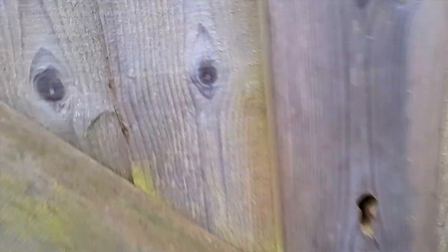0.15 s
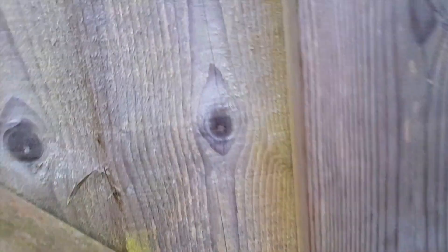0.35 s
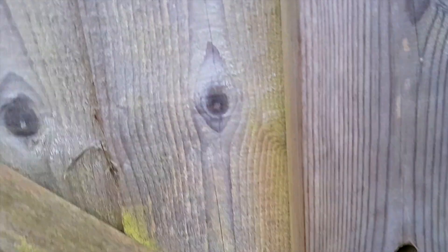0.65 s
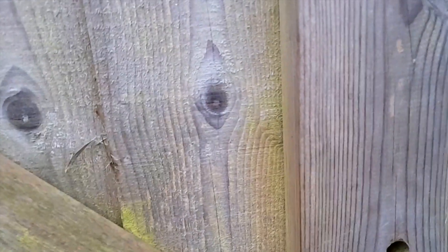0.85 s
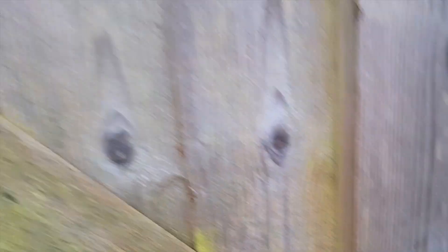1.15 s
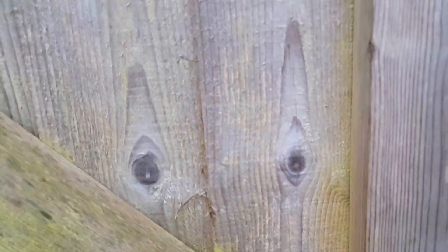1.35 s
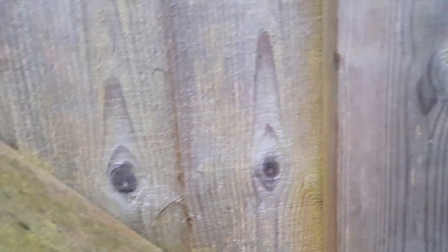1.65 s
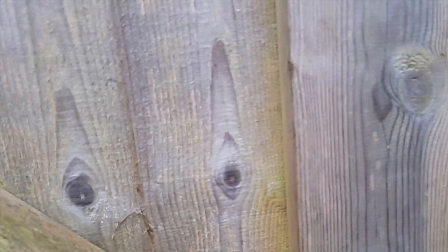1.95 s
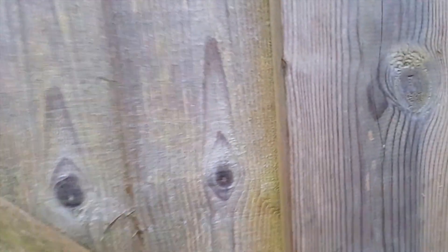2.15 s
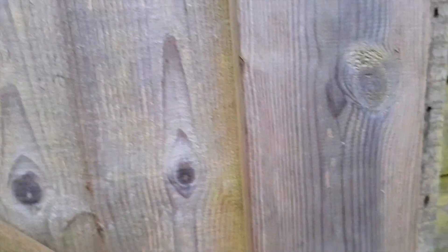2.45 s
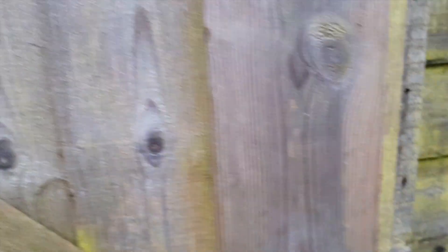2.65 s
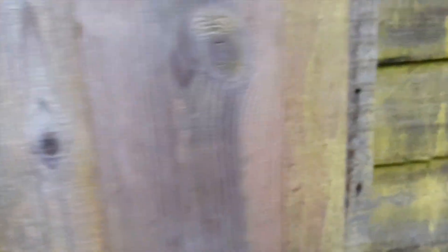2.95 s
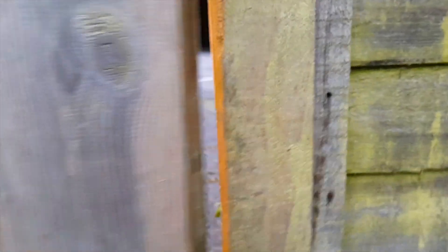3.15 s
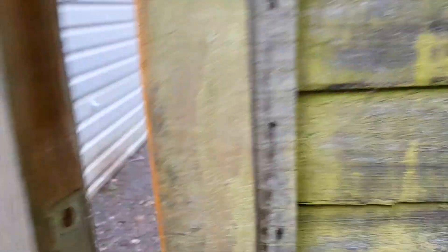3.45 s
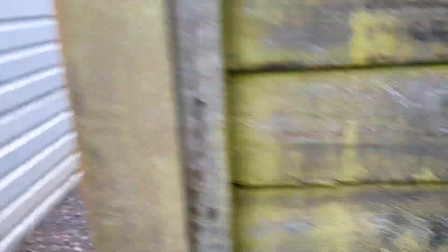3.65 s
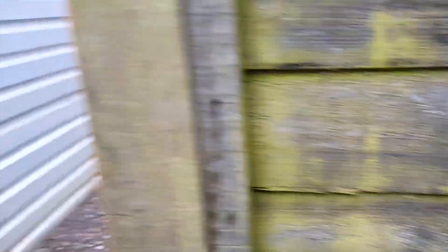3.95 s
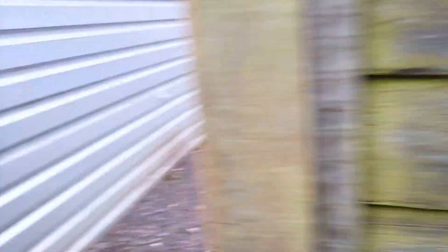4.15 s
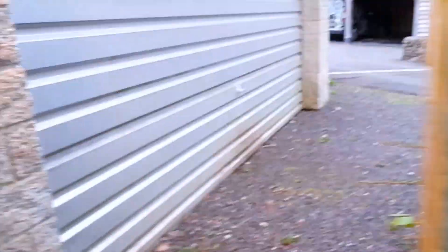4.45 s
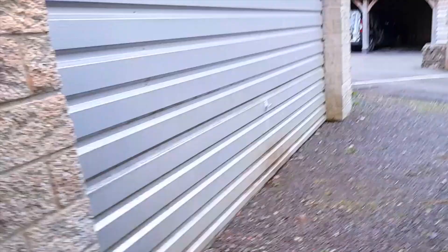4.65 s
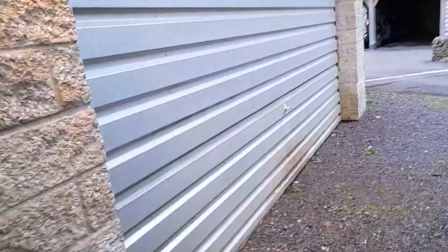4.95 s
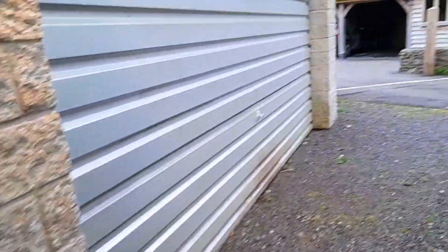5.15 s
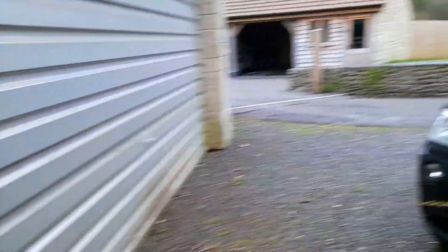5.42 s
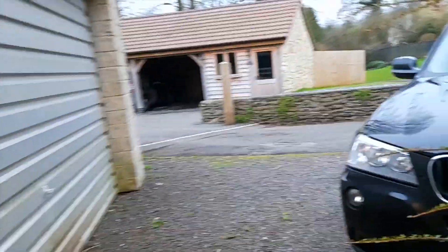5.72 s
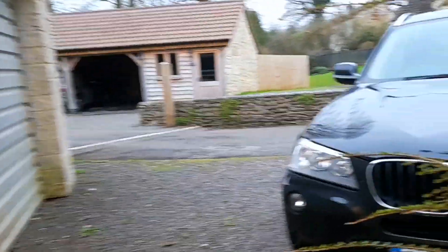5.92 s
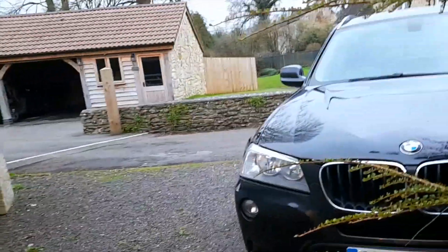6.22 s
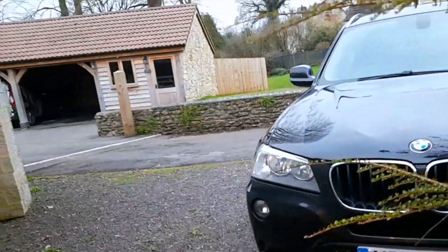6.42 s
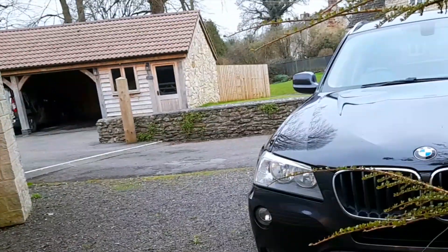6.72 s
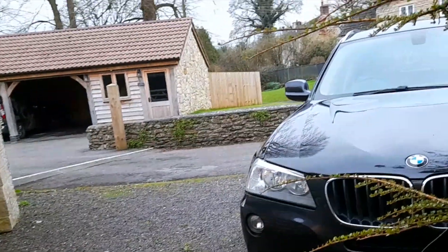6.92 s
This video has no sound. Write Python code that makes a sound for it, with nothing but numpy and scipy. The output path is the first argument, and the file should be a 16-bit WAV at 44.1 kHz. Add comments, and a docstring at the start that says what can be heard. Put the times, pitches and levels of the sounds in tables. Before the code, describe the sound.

A wooden garden gate is shoved, knocked and unlatched with steel clacks, scrapes open, then steps scuff on gravel while birds trill and warble.

```python
"""Low outdoor rumble and a scraping shove come first, then a wooden garden gate close by is knocked and unbolted.
Boards ring as dying bands of noise and tones, steel bolt and latch as sine modes, scrapes as grainy noise.
The gate scrapes, rasps and clacks, then steps scuff on to a gravel drive, made of noise and small ticks.
Birds are fluttering tones: whistles, hoarse chirps, a far pigeon, a repeated rising note, a loud warble.
Far traffic is noise that swells, sinks and ends clearest; walls, hedges and trees answer with diffuse echoes."""
import sys
import numpy as np
from scipy import signal
from scipy.fft import rfft, irfft, next_fast_len
from scipy.io import wavfile
from scipy.ndimage import uniform_filter1d, map_coordinates

SR = 44100
rng = np.random.default_rng(int(sys.argv[2]) if len(sys.argv) > 2 else 0)


def to_wav(s):
    """Save 16-bit WAV."""
    ch = np.atleast_2d(s).T  # columns
    pcm = np.round(np.clip(ch, -1, 1) * 32767)  # PCM
    wavfile.write(sys.argv[1], SR, pcm.astype(np.int16))


N = 312221  # length in samples

# Levels in the tables are relative: gains further on shift them.
# A left_right_db above zero means that the left is louder.


def amp(db):
    """Turn decibels into a gain."""
    return 10 ** (np.asarray(db) / 20)


def unit(x):
    """Scale a sound to an rms of 1."""
    return x / np.sqrt(np.mean(x ** 2) + 1e-20)


def along(points, hz):
    """Read a curve of (Hz, value) points on a log pitch axis."""
    point_hz, value = np.transpose(points)
    return np.interp(np.log(hz + 1), np.log(point_hz + 1), value)


def curves(rows):
    """Draw each column after the time as a curve with one value per sample."""
    s, *columns = np.transpose(rows)
    return [np.interp(np.arange(N) / SR, s, column) for column in columns]


def wobble(rate, size=N):
    """Draw a smooth random curve through `rate` random knots a second."""
    knots = rng.standard_normal(int(size * rate / SR) + 4)
    return map_coordinates(knots, [np.arange(size) * rate / SR])


def filtered(x, response):
    """Shape the spectrum of x by a gain that depends on frequency."""
    n = x.shape[-1]
    padded = next_fast_len(n + 4096)
    return irfft(rfft(x, padded) * response(np.fft.rfftfreq(padded, 1 / SR)), padded)[..., :n]


def pan(db):
    """Left and right gains for a level difference."""
    return amp([[db / 2], [-db / 2]])


def add(track, s, sound):
    """Mix a sound into the track at a time in seconds."""
    part = track[..., max(round(s * SR), 0):][..., :sound.shape[-1]]
    part += sound[..., :part.shape[-1]]


def fade(t, t60):
    """Free decay of a vibration: 60 dB down after t60 seconds."""
    return np.exp(-np.log(1000) * t / t60)


# how alike left and right are: pitch_hz, likeness (1 is identical)
ALIKE = [(60, 0.62), (200, 0.79), (400, 0.67), (700, -0.05), (1400, 0.03), (4000, -0.041)]


def pair(size):
    """White stereo noise, mostly shared in the bass and nearly unrelated in the treble."""
    turn = lambda hz: np.arccos(np.clip(along(ALIKE, hz), -1, 1)) / 2
    mid_side = lambda hz: np.array([np.cos(turn(hz)), np.sin(turn(hz))])
    mid, side = filtered(rng.standard_normal((2, size)), mid_side)
    return np.array([mid + side, mid - side])


def rush(spectrum):
    """Coloured stereo noise with an rms of 1."""
    return unit(filtered(pair(N), lambda hz: amp(along(spectrum, hz))))


def echo(x, decay, build_s):
    """A diffuse tail of noise that gathers, then dies at its own speed at each frequency."""
    hz, t, grid = signal.stft(rng.standard_normal((2, SR)), SR, nperseg=256)
    dying = grid * amp(-60 * t / along(decay, hz)[:, None])
    tail = signal.istft(dying, SR, nperseg=256)[1]
    tail *= np.clip(np.arange(tail.shape[1]) / SR / build_s, 0, 1)
    return signal.fftconvolve(x, tail / np.linalg.norm(tail[0]), axes=1)[:, :N]


# quick answer of hedges and roofs: pitch_hz, t60_s
HEDGES = [(500, .3), (3000, .17), (8000, .15)]
# long answer of the trees: pitch_hz, t60_s
TREES = [(500, 0.4), (3000, 0.65), (8000, 0.53)]
HEDGES_BUILD_S, TREES_BUILD_S = .008, 0.058  # time over which each echo gathers
TREES_DB = -6  # relative to the hedges


def garden(x):
    """Hedges and roofs blur a bird's call at once; the trees hold it faintly for longer."""
    hedges = echo(x[None], HEDGES, HEDGES_BUILD_S)
    return hedges + amp(TREES_DB) * echo(x[None], TREES, TREES_BUILD_S)


def whistle(hz, rough, flicker_db=3):
    """A nearly pure tone whose pitch and strength flutter."""
    hz = hz * (1 + rough * wobble(498.2, size=len(hz)))
    tone = np.sqrt(2) * np.sin(2 * np.pi * np.cumsum(hz) / SR)
    return tone * amp(flicker_db * wobble(110, size=len(hz)))


def patchy(x, depth_db):
    """Moving air lets different pitches of a far sound swell and sink."""
    grid = signal.stft(x, nperseg=2048)[2]
    field = rng.standard_normal(grid.shape[1:])
    field = uniform_filter1d(field, size=4, axis=0)  # smooth over pitch
    field = uniform_filter1d(field, size=9, axis=1)  # smooth over time
    return unit(signal.istft(grid * amp(depth_db * unit(field)), nperseg=2048)[1][:, :N])


# outdoor background, screened until the gate is passed: time_s, rumble_db, traffic_db
AIR = [(0, -45.5, -74.5), (1.4, -57.5, -60.5), (2.1, -55, -72), (4.1, -58.5, -64), (4.9, -57, -58.5),
       (7.08, -56.5, -56.5)]
# colour of the low rumble: pitch_hz, level_db per Hz
RUMBLE = [(20, -25.5), (40, 0), (62, -0.5), (90, -1.5), (160, -5), (250, -9.5), (400, -18), (600, -35),
          (1500, -59.5)]
# colour of the far traffic: pitch_hz, level_db per Hz
TRAFFIC = [(120, -33), (280, -6.5), (400, -7), (520, 1), (700, -3), (950, -3.5), (1180, -13.5), (1380, -7),
           (1900, -22.5), (2230, -15), (2900, -32), (5000, -53.5)]
# colour of the faint hiss: pitch_hz, level_db per Hz
HISS = [(1500, 1), (3000, -3.5), (6000, -3.5), (8400, -13.5), (9800, -0.5), (11500, -7), (14000, -2.5),
        (16000, -15)]


def outdoors():
    """Unsteady low rumble, patchy far traffic and a faint even hiss, all coloured noise."""
    rumble_db, traffic_db = curves(AIR)
    rumble = amp(rumble_db - 3.5 + 1.1 * wobble(9.6)) * rush(RUMBLE)
    traffic = amp(traffic_db + 0.7) * patchy(rush(TRAFFIC), depth_db=1.8)
    hiss = amp(-69.5) * rush(HISS)
    return rumble * pan(2.0) + traffic * pan(-0.57) + hiss * pan(1.2)


def swell(s, hold, attack, release):
    """An effort that builds up, holds and dies away."""
    t = np.arange(N) / SR - s
    return fade(np.maximum(-t, 0), attack) * fade(np.maximum(t - hold, 0), release)


def effort(rows, attack, release):
    """Strength of the rubbing and of the low shudder over a series of pushes or steps."""
    scrape, shudder = np.zeros(N), np.zeros(N)
    for s, hold, scrape_db, shudder_db in rows:
        shape = swell(s, hold, attack, release)
        scrape = np.maximum(scrape, amp(scrape_db) * shape)
        shudder = np.maximum(shudder, amp(shudder_db) * shape)
    return scrape, shudder


# resonances of boards and frame: pitch_hz, width_hz, level_db
FRAME = [(261, 11, 8), (360.5, 32, -9), (626.7, 5.9, 5), (1037, 110, 4), (1163, 17, 0.5), (1450, 52, 5),
         (1617, 49, 7.5), (2104, 130, 3.5), (2305, 290, 6.5)]


def frame_db(hz):
    """Lift given by the resonances of boards and frame."""
    return sum(db / (1 + (2 * (hz - centre) / width) ** 2) for centre, width, db in FRAME)


# the hand pushes the gate: full_force_s, hold_s, scrape_db, shudder_db
PUSHES = [(0, 0.0036, -56.5, -40), (.13, 0.091, -58.5, -48), (.35, 0.29, -58.5, -35.5),
          (1.31, 0.16, -61, -59.5), (2.45, 0.052, -66.5, -45), (2.8, 0.11, -68.5, -53),
          (2.97, .1, -59, -54), (3.138, .022, -42, -37.5), (3.25, 0.11, -51.5, -44.5),
          (3.405, 0.013, -52.5, -45.5), (3.56, 0.011, -46, -40)]
PUSH_ATTACK_S, PUSH_RELEASE_S = 0.45, 0.51  # each over 60 dB
# colour of wood rubbing on wood: pitch_hz, level_db per Hz
RUB = [(180, -38.5), (300, -3), (740, -5.5), (930, -12.5), (1140, -9), (2250, -9.5), (2900, -14.5),
       (5000, -12), (8500, -27.5), (10500, -19.5), (14000, -30.5), (16000, -39)]
# colour of the hollow gate's shudder: pitch_hz, level_db per Hz
HOLLOW = [(20, -13), (35, -7.5), (65, -4), (110, -0.5), (165, 0), (225, 2), (290, 0), (370, -11.5),
          (460, -9), (600, -8.5), (700, -31), (950, -16), (1500, -51.5)]


def rubbing(force, shaking, grain_db=3, judder_db=3):
    """Rough surfaces catch and slip in tiny grains, while the hollow gate shudders."""
    surge_db = 1.8 * wobble(70)
    grain = amp(grain_db * wobble(700) + surge_db)
    wood = filtered(rush(RUB), lambda hz: amp(0.39 * frame_db(hz)))
    scrape = amp(2.5) * force * unit(wood * grain)
    shudder = shaking * unit(rush(HOLLOW) * amp(judder_db * wobble(45)))
    return scrape * pan(1.2) + shudder * pan(1.5)


def grit(force, rate=110, scatter_db=-2.0):
    """Splinters and loose stones give way one by one, as loud as the rubbing is hard."""
    scatter = amp(scatter_db * np.clip(rng.standard_normal(N), -2, 2))
    slips = (rng.random(N) < rate / SR) * force * scatter  # on average `rate` a second
    t = np.arange(SR // 50) / SR
    tick = unit(filtered(pair(len(t)), lambda hz: amp(along(RUB, hz)))) * fade(t, 0.0084)
    return amp(-8) * signal.fftconvolve(slips[None], tick, axes=1)[:, :N]


# thin falling calls: start_s, length_s, first_pitch_hz, fall in octaves per s, level_db
SLURS = [(0.667, 0.12, 4750, 3.3, -71), (0.861, 0.086, 6680, 3.1, -57), (1.039, 0.075, 6530, 3.7, -55),
         (1.193, 0.047, 5350, 2.7, -50), (2.711, .048, 6910, 3.2, -68.5), (2.881, 0.087, 7100, 4, -61.5),
         (4.477, 0.042, 7780, 3.4, -47), (4.593, 0.032, 7630, 3.6, -45.5), (4.712, 0.054, 7830, 3.5, -47.5),
         (5.196, 0.11, 6850, 3.1, -46.5), (5.39, 0.071, 6700, 3.5, -48.5),
         (5.444, 0.046, 6050, 3.65, -44.5), (5.484, 0.03, 5700, 14, -41.5), (5.528, 0.021, 6000, 9, -52),
         (5.672, 0.079, 6400, 3.7, -59), (5.89, .05, 6300, 6.2, -60), (6.925, 0.062, 7050, 3.2, -65)]
# held whistles: start_s, length_s, pitch_hz, level_db, flutter (scaled below), share by which it starts flat
WHISTLES = [(0.023, 0.26, 7550, -63.5, 1, 0.02), (0.627, 0.054, 4850, -53, 0.86, 0.057),
            (0.933, 0.4, 4520, -65, 0.72, 0.015), (2.9, 0.096, 4710, -45.5, 0.32, 0.08),
            (4.007, 0.15, 5590, -44, 0.19, 0.05), (4.505, 0.038, 2500, -51, 0.5, .04),
            (4.954, 0.059, 5000, -51, 1.7, 0.067), (5.409, 0.032, 5350, -38, 0.8, 0.1),
            (5.416, 0.056, 4450, -47, 0.77, .03), (5.42, 0.05, 3130, -54, 0.7, .13),
            (6.16, 0.066, 4370, -48, 0.15, 0.26), (6.51, 0.18, 4705, -61, 0.15, 0),
            (6.536, 0.13, 2250, -71.5, 0, 0.029)]
SCOOP_S, SCOOP_DB = .028, -13  # time of the slide up to pitch; level at its foot
SAG_PER_S = 0.17  # share of its pitch by which a held whistle sinks each second


def twitter(flutter_depth=0.045, slur_rough=0.0092):
    """Falling calls and held whistles from the trees, each a fluttering tone."""
    out = np.zeros(N)
    note = lambda hz, db, rough: amp(db) * whistle(hz, rough) * signal.windows.tukey(len(hz), .3)
    for s, length, hz, fall, db in SLURS:
        t = np.arange(int(length * SR)) / SR
        add(out, s, note(hz * 2 ** (-fall * t), db, slur_rough))
    for s, length, hz, db, flutter, scoop in WHISTLES:
        t = np.arange(int(length * SR)) / SR
        below = np.maximum(1 - (t / SCOOP_S) ** 2, 0)
        pitch = hz * (1 - scoop * below - SAG_PER_S * t)
        add(out, s, note(pitch, db + SCOOP_DB * below, flutter * flutter_depth))
    return amp(-9.5) * out * pan(3.5) + amp(-7) * garden(out)


# blows on the gate: start_s, thud_db, clack_db, clack_pitch_hz, rebounds (rounded), left_right_db
BLOWS = [(.121, -46, -50, 3560, 0, -7.5), (0.25, -47, -55.5, 1380, 0, -1), (0.322, -79, -46.5, 2398, 0, -3),
         (.391, -26, -33.5, 1498, 0, -9.5), (.395, -30, -15.5, 2600, 0, -1.5),
         (0.499, -44, -39.5, 1840, 0, -4), (.536, -45, -40.5, 1860, 1, -9),
         (0.552, -26.5, -30, 1920, 0.5, -3), (.78, -22.5, -17, 7040, 0, -2.5),
         (0.786, -35, -32, 2340, 0, 4), (.8, -30.5, -25, 2940, 1, -4), (.911, -38, -46, 1398, 0, -5.5),
         (1.172, -26, -23.5, 1135, 0, 1.5), (1.181, -19.5, -25.5, 1390, 0, -4.5),
         (2.41, -34.5, -43, 1336, 0, -0.5), (2.485, -46, -31, 11180, 0, -2.5),
         (2.519, -36.5, -37.5, 2010, 0, -4), (2.736, -56.5, -44.5, 1730, 0, -1.5),
         (2.954, -57, -49, 2220, 0, -8), (2.986, -78, -45, 2300, 0, -5), (3.11, -43, -38, 1310, 0, -7),
         (3.178, -35.5, -30, 3400, 0, 1), (3.242, -41, -48.5, 1100, 0, 0.5),
         (3.268, -48, -34.5, 1720, 0, 0), (3.305, -51, -36.5, 3020, 0, 4),
         (3.312, -42.5, -35.5, 2260, 0, -3.5), (3.375, -60, -51.5, 1620, 0, -3),
         (3.501, -59, -26.5, 4250, 0, 5), (3.504, -57, -28, 4240, 0, 1.5), (3.508, -46, -27, 2010, 0, -2.5),
         (3.586, -48, -35.5, 1455, 0, -4), (4.186, -71, -38, 2066, 0, -8),
         (4.197, -47.5, -40, 5850, 0, 5.5), (4.589, -39.5, -42.5, 1490, 1, 5.5),
         (4.606, -25.5, -25, 6000, 0, 0), (4.611, -28.5, -26.5, 1270, 1, -5.5),
         (4.707, -29.5, -37, 3480, 0, -1), (4.924, -73, -59, 7000, 0, 2), (5.138, -87, -56.5, 12000, 0, 0)]
REBOUND_S = 0.0096  # flight time of a rebound
# losses and pitch ratio of each rebound
REBOUND_THUD_DB, REBOUND_CLACK_DB, REBOUND_PITCH_RATIO = 9, 10, 1


def contacts():
    """A hard blow rebounds, each time weaker."""
    return [(s + k * REBOUND_S, thud - k * REBOUND_THUD_DB, clack - k * REBOUND_CLACK_DB,
             hz * REBOUND_PITCH_RATIO ** k, side)
            for s, thud, clack, hz, rebounds, side in BLOWS for k in range(round(rebounds) + 1)]


# how long the boards sound: pitch_hz, t60_s
BOARDS_DIE = [(100, 0.23), (300, 0.14), (700, 0.072), (2000, 0.058), (5000, 0.027), (12000, 0.019)]


def ringing(level_db, t, right_lead_s=0.00031):
    """The frame's modes ring on, in a new balance at each blow, a little earlier on the right."""
    hz, _, db = np.transpose(FRAME)[:, :, None]
    luck_db = rng.normal(0, 2, hz.shape)
    phase = 2 * np.pi * rng.random(hz.shape)
    heard = t + np.array([0, right_lead_s])[:, None, None]
    strength = amp(level_db(hz) + db + luck_db) * fade(t, along(BOARDS_DIE, hz))
    modes = strength * np.sin(2 * np.pi * hz * heard + phase)
    return modes.sum(1) * (1 - np.exp(-t / .001))


# the boards' answer to a blow: pitch_hz, level_db
BOARDS = [(30, -7), (70, 6), (130, 8), (260, 13.5), (450, 18), (750, 13.5), (1200, 13.5), (1750, 8.5),
          (2300, 9.5), (3000, 5.5), (4500, 9), (7000, 7), (11000, 6.5), (16000, -5.5)]
CLACK_FALL_DB = 9.5  # lost per octave above the pitch of the clack


def knocks(count=8, ring_db=-24, snap_db=3, snap_t60=0.0074):
    """Each blow snaps, then sets off the dense modes of the boards; the high ones die first."""
    out, t = np.zeros((2, N)), np.arange(SR // 4) / SR
    centres = np.geomspace(100, 12800, count)
    # overlapping bands that together cover all pitches
    bands = lambda hz: np.array([along(np.c_[centres, one], hz) for one in np.eye(count)])[:, None]
    band_hz = centres[:, None, None]
    # the upper bands follow the snap of first contact best
    snap = amp(snap_db) * fade(t, snap_t60) * band_hz / (band_hz + 1500)
    rise = 1 - np.exp(-t / (.0004 + 1 / band_hz))
    dying = (fade(t, along(BOARDS_DIE, band_hz)) + snap) * rise
    body_db = lambda hz: along(BOARDS, hz) + frame_db(hz)
    for s, thud, clack, clack_hz, side in contacts():
        fall_db = lambda hz: CLACK_FALL_DB * np.log2(np.maximum(hz / clack_hz, 1))
        force_db = lambda hz: along([(300, thud), (clack_hz, clack)], hz) - fall_db(hz)
        parts = filtered(pair(len(t)), lambda hz: bands(hz) * amp(force_db(hz) + body_db(hz)))
        # the bass always leans left
        sides = np.array([pan(db) for db in along([(350, 3), (1200, side)], centres)])
        add(out, s, amp(1) * (parts * dying * sides).sum(0))
        ring_level_db = lambda hz: ring_db + force_db(hz) + along(BOARDS, hz)
        add(out, s, pan(side) * ringing(ring_level_db, t))
    return out


SHAKE_DB, SHAKE_T60 = -19, 0.56  # level relative to the blow's thud; decay in s


def aftershake():
    """Strength of the shudder that every blow leaves in the gate."""
    shaking, t = np.zeros(N), np.arange(SR) / SR
    for s, thud_db, *_ in BLOWS:
        add(shaking, s, amp(thud_db + SHAKE_DB) * fade(t, SHAKE_T60))
    return shaking


# the boards swing as the gate shifts in its frame, and later the steps thud: start_s, peak_db, pitch_hz
BUMPS = [(0.305, -27, 249), (.32, -27, 190), (0.383, -18.5, 227), (0.423, -21.5, 222), (0.565, -15.5, 231),
         (0.616, -27.5, 295), (0.644, -29, 200), (0.803, -15.5, 346), (1.184, -30, 223), (1.22, -30, 212),
         (3.11, -44.5, 1300), (3.128, -31, 293), (3.176, -34, 905), (3.188, -39, 510), (3.202, -31.5, 250),
         (3.243, -33.5, 340), (3.359, -38, 255), (3.514, -31, 260), (3.549, -29.5, 257), (3.59, -32.5, 513),
         (4.463, -38, 250), (4.723, -30, 287), (4.774, -33, 203), (7.043, -26.5, 76), (7.052, -29.5, 150)]


def bumps(peak_s=0.0028):
    """The whole gate swings briefly against its frame, or a step lands heavily: a tone that swells and dies at
    once."""
    out, t = np.zeros(N), np.arange(SR // 8) / SR
    for s, db, hz in BUMPS:
        shape = t / peak_s * np.exp(1 - t / peak_s)
        add(out, s, amp(db) * shape * np.sin(2 * np.pi * hz * t))
    return out * pan(1.6)


# steel on steel, damped by the hand that holds it:
# start_s, level_db, most_excited_hz, spread in octaves, share of free ring time, left_right_db
CLINKS = [(.396, -20, 12780, 0.029, 0.5, -6), (.398, -21, 2347, 0.23, 0.23, -15),
          (.781, -24.5, 9640, 1.1, 1, -1.5), (.801, -31.5, 7040, .08, 1, -6),
          (2.413, -62, 7000, 0.091, 0.51, -8), (2.484, -18, 10680, 0.016, 0.51, -8),
          (2.485, -21.5, 5730, 0.3, 0.58, -3), (2.49, -25, 12700, .03, 0.38, -7),
          (3.502, -8, 4300, 0.09, 0.2, -12), (4.606, -12, 9740, 0.036, 0.069, 17.5)]
# modes of bolt and latch when free: pitch_hz, level_db, t60_s
STEEL = [(2347, -6, .12), (4452, -11, .11), (4700, -8, .09), (5870, -6, .07), (7120, -5, .18),
         (8489, -11, .06), (9063, 0, .18), (9308, -10, .06), (9878, 2, .13), (10678, -1, .16),
         (12700, -6, .11), (14692, -9, .16)]


def clinks(chatter_db=3.5, right_phase=1.59):
    """The point of contact decides which of the steel's modes ring; the loose bar chatters as it rings."""
    out, t = np.zeros((2, N)), np.arange(SR // 3) / SR
    for s, db, best_hz, spread, free, side in CLINKS:
        for hz, level, t60 in STEEL:
            excited = 1 / (1 + (np.log2(hz / best_hz) / spread) ** 2)
            phase = rng.uniform(0, 2 * np.pi) + np.array([[0], [right_phase]])  # radians
            chatter = chatter_db * fade(t, .25) * wobble(250, size=len(t))
            strength = amp(db + level + chatter) * excited * fade(t, free * t60)
            ring = strength * np.sin(2 * np.pi * hz * t + phase)
            add(out, s, pan(side) * ring * (1 - np.exp(-t / 0.0013)))
    return out


# raspy chirps from a far hedge: start_s, length_s, pitch_hz, glide and arch as shares of pitch, level_db
CHIRPS = [(0.685, 0.12, 1770, -0.25, 0.25, -61), (1.297, 0.092, 1817, -0.042, 0.355, -63.5),
          (1.474, 0.094, 1814, 0, 0.86, -56), (2.515, 0.1, 1872, -0.21, 0.51, -58.5),
          (3.642, 0.076, 1990, 0, 0.4, -60), (5.723, 0.058, 1700, 0.054, 0.047, -51.5),
          (5.749, .1, 1765, -0.3, 0.12, -48.5), (5.814, 0.096, 1717, -0.27, 0.3, -51.5),
          (5.876, .05, 2030, -0.11, 0.37, -62), (5.975, 0.037, 2230, 0.51, .1, -56),
          (6.768, 0.11, 1735, -0.09, 0.83, -52.5), (6.978, 0.087, 1823, -0.011, 0.47, -50.5)]
# resonances of the bird's throat: pitch_hz, level_db
THROAT = [(1700, -19.5), (2300, -17), (2900, -2.5), (3500, 2), (4300, 4), (5100, -8), (6200, -19.5),
          (8000, -29)]
HOARSE, RATTLE = .02, .22  # pitch jitter; share of power that is noise round the harmonics


def chirps(count=4):
    """Hoarse harmonics, partly broken into noise, glide and arch through the throat's resonances."""
    out = np.zeros(N)
    for s, length, pitch_hz, glide, arch, db in CHIRPS:
        u = np.linspace(-.5, .5, int(max(length, .01) * SR))
        hoarse = HOARSE * wobble(900, size=len(u))
        base_hz = np.abs(pitch_hz * (1 + glide * u - arch * u ** 2 + hoarse))
        hz = np.arange(1, count + 1)[:, None] * base_hz
        phase = 2 * np.pi * (np.cumsum(hz, axis=1) / SR + rng.random((count, 1)))
        rattle = np.array([wobble(400 * (k + 1), size=len(u)) for k in range(count)])
        voice = np.sqrt(1 - RATTLE) * np.sin(phase) + np.sqrt(RATTLE) * rattle * np.cos(phase)
        flicker = amp(3 * wobble(150, size=len(u)))
        call = unit((amp(along(THROAT, hz)) * voice).sum(0) * flicker)
        add(out, s, amp(db) * call * np.cos(np.pi * u))
    return out * pan(1.5) + amp(-2.5) * garden(out)


# the far pigeon: start_s, pitch_hz, level_db
COOS = [(1.66, 591, -65.5), (2.3, 614, -70.5), (4.87, 590, -58.5), (5.24, 722, -58), (5.43, 585.5, -55.5),
        (6.38, 518, -63.5), (6.81, 538, -58.5)]


def pigeon(length=0.1456, fall=0.206):
    """Soft falling tones, followed by the long echo of the trees."""
    out, u = np.zeros(N), np.linspace(0, 1, int(length * SR))
    for s, hz, db in COOS:
        coo = whistle(hz * (1 - fall * (u - .3)), rough=0.095)
        add(out, s, amp(db) * coo * np.sin(np.pi * u))
    return amp(5.5) * out + amp(2.5) * echo(out[None], TREES, TREES_BUILD_S)


# the gate's edge drags hard along the post: full_force_s, hold_s, level_db
RASPS = [(3.136, 0.026, -36), (3.559, 0.022, -48.5)]
RASP_ATTACK_S, RASP_RELEASE_S = 0.24, .2  # each over 60 dB
# colour of the bright rasp: pitch_hz, level_db per Hz
RASP = [(1500, -30.5), (3500, -9.5), (4500, 0.5), (5300, 4), (6300, -5.5), (8500, -7.5), (9600, -4),
        (11000, -9.5), (14000, -2.5), (16000, -15.5)]


def rasping(grain_db=2):
    """Wood fibres hiss where the edge of the gate binds: bright, grainy noise."""
    force = sum(amp(db) * swell(s, hold, RASP_ATTACK_S, RASP_RELEASE_S) for s, hold, db in RASPS)
    return force * unit(rush(RASP) * amp(grain_db * wobble(900))) * pan(6.7)


# the songbird's repeated rising note: start_s, top_pitch_hz, level_db, swell_db over the note
TRILL = [(3.331, 3290, -42.5, 1), (3.491, 3484, -38, -2), (3.669, 3430, -41, 1), (3.849, 3260, -46, 8),
         (4.031, 3336, -44, 0), (4.196, 3350, -42, 4), (4.367, 3377, -42, 14), (4.535, 3230, -45, -3),
         (4.704, 3256, -46, -5)]
# shape of that note: share of its length, pitch ratio, level_db
RISE = [(0, .73, -15), (.17, .825, -4), (.38, .9, 0), (.6, .96, 0), (.85, 1, 0), (1, .995, -6)]


def songbird(length=.115):
    """One upward slur, repeated about six times a second and never quite alike."""
    out, u = np.zeros(N), np.linspace(0, 1, int(length * SR))
    at, ratio, shape_db = np.transpose(RISE)
    for s, top_hz, db, swell_db in TRILL:
        drift = 1 + .006 * wobble(40, size=len(u))
        note = whistle(top_hz * np.interp(u, at, ratio) * drift, rough=.009)
        level_db = db + swell_db * (u - .5) + np.interp(u, at, shape_db)
        add(out, s, note * amp(level_db) * signal.windows.tukey(len(u), .1))
    return amp(-9.5) * out * pan(-1.6) + amp(-8.5) * garden(out)


# steps on the gravel: full_weight_s, hold_s, scuff_db, thud_db
STEPS = [(4.19, 0.0098, -51.5, -48), (4.33, 0.1, -58, -52), (4.46, 0.011, -55.5, -45.5),
         (4.59, 0.025, -49, -42.5), (4.77, 0.016, -50.5, -42), (4.93, 0.039, -57, -71),
         (5.265, 0.019, -48.5, -51.5), (5.79, 0.029, -55, -56.5), (7.04, 0.071, -44.5, -46)]
STEP_ATTACK_S, STEP_RELEASE_S = 0.26, 0.64  # each over 60 dB
# colour of soles on gravel: pitch_hz, level_db per Hz
SCUFF = [(180, -29), (320, -4.5), (700, 3.5), (1150, -10), (2250, -6.5), (2900, -15), (5000, -10),
         (8000, -28.5), (10500, -21.5), (15000, -33.5)]


def scuffing(weight, grain_db=3):
    """Soles grind softly on the gravel: grainy noise that follows the weight."""
    return amp(1.5) * weight * unit(rush(SCUFF) * amp(grain_db * wobble(600))) * pan(0.31)


# one loud warbled phrase: time_s, pitch_hz, level_db
WARBLE = [(5.457, 3950, -50), (5.471, 4520, -28), (5.479, 4620, -45), (5.496, 4760, -38),
          (5.508, 4620, -39), (5.517, 4350, -31), (5.524, 3400, -48), (5.532, 3500, -45),
          (5.540, 3850, -29), (5.546, 4080, -39), (5.549, 2950, -56), (5.557, 2930, -42),
          (5.569, 3480, -44), (5.577, 3760, -28), (5.589, 4000, -32), (5.597, 4080, -40),
          (5.605, 3900, -31), (5.614, 3750, -50)]


def warbler(overtone_db=-42):
    """A nearer bird zigzags through one slightly burred phrase in short bursts."""
    out = np.zeros(N)
    at, hz, db = np.transpose(WARBLE)
    t = np.arange(at[0], at[-1], 1 / SR)
    pitch = np.interp(t, at, hz)
    overtone = amp(overtone_db) * whistle(2 * pitch, rough=.02)
    voice = whistle(pitch, rough=.011, flicker_db=2) + overtone
    add(out, at[0], amp(np.interp(t, at, db)) * voice)
    return amp(-7.5) * out * pan(1.5) + amp(-15) * garden(out)


# the walls' answer to the near sounds: pitch_hz, t60_s
WALLS = [(150, 0.24), (1000, 0.24), (4000, 0.28), (12000, 0.028)]
WALLS_BUILD_S = 0.01  # time over which the echo gathers


def scene():
    """The gate between its walls, with the garden behind."""
    force, judder = effort(PUSHES, PUSH_ATTACK_S, PUSH_RELEASE_S)
    weight, tread = effort(STEPS, STEP_ATTACK_S, STEP_RELEASE_S)
    shaking = np.sqrt(judder ** 2 + tread ** 2 + aftershake() ** 2)
    gate = rubbing(force, shaking) + knocks() + bumps() + clinks() + rasping()
    near = gate + grit(force + weight) + scuffing(weight)
    birds = twitter() + chirps() + pigeon() + songbird() + warbler()
    return outdoors() + near + amp(-23.0) * echo(near, WALLS, WALLS_BUILD_S) + birds


TOP_HZ = 15900  # nothing is heard above this


def record(dry, boom_hz=66, boom_width_hz=11, boom_db=6):
    """The whole sound booms at one low resonance and stops sharply at its highest pitch."""
    boom = lambda hz: 1j * hz * boom_width_hz / (boom_hz ** 2 - hz ** 2 + 1j * hz * boom_width_hz)
    return filtered(dry, lambda hz: (1 + amp(boom_db) * boom(hz)) * (hz < TOP_HZ))


dry = scene()
out = record(dry)
to_wav(out)
```